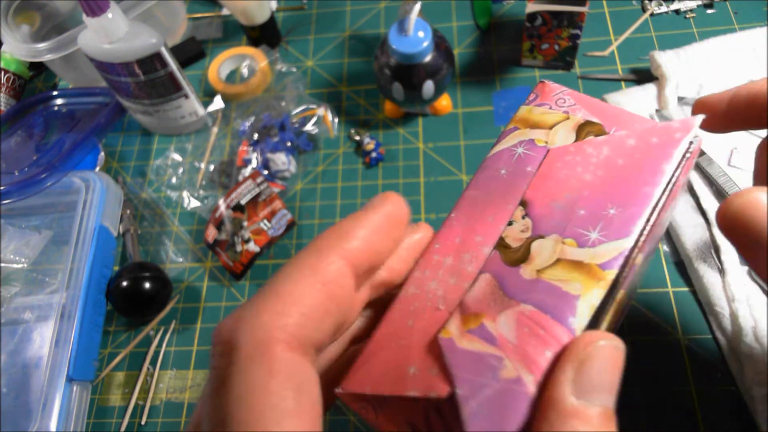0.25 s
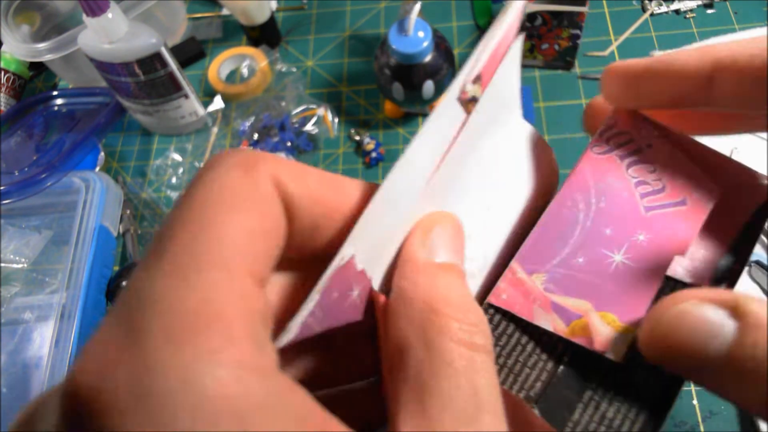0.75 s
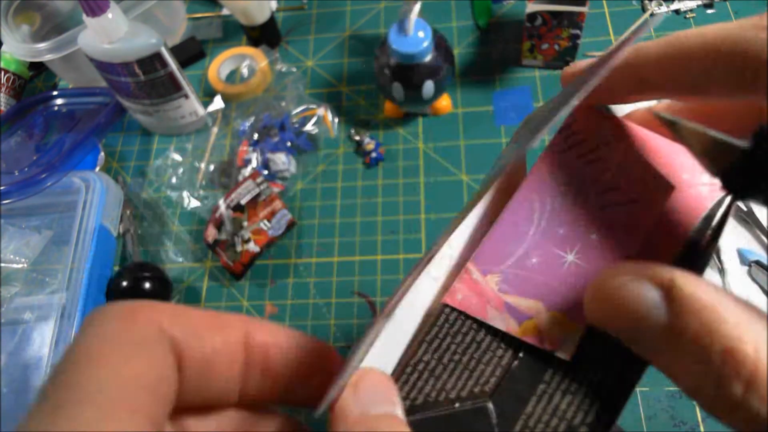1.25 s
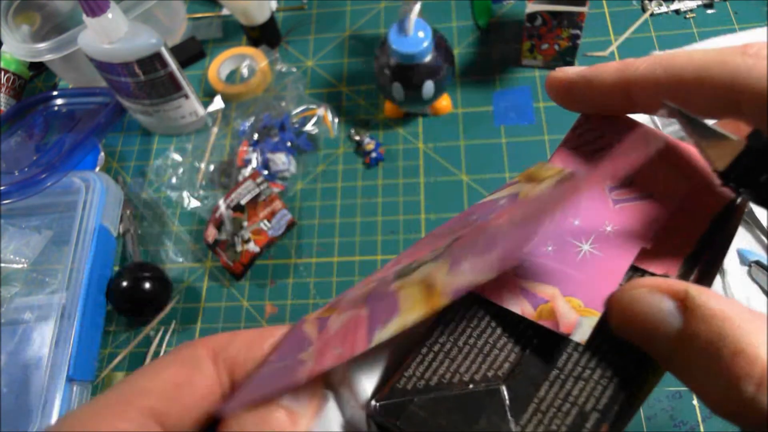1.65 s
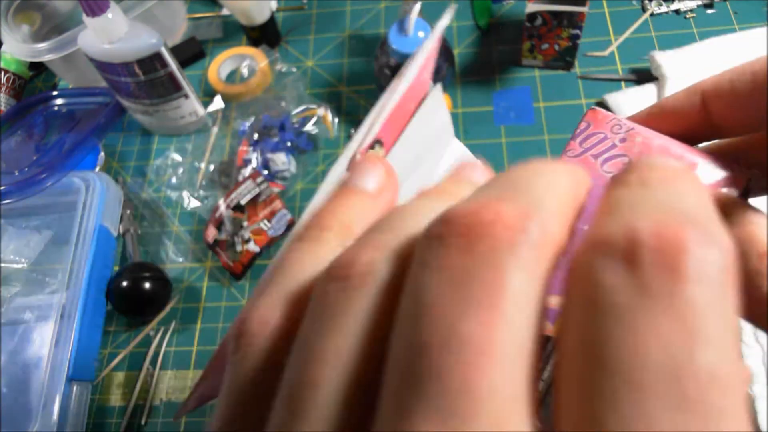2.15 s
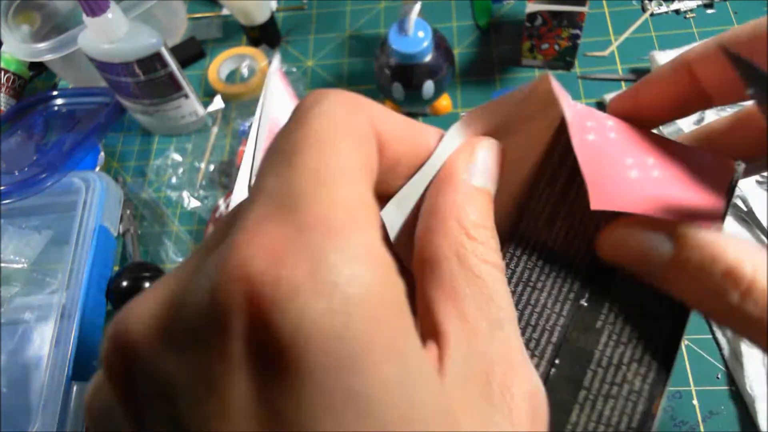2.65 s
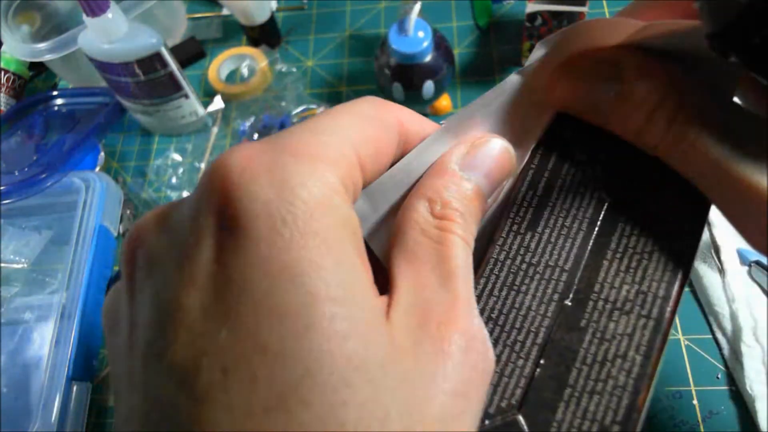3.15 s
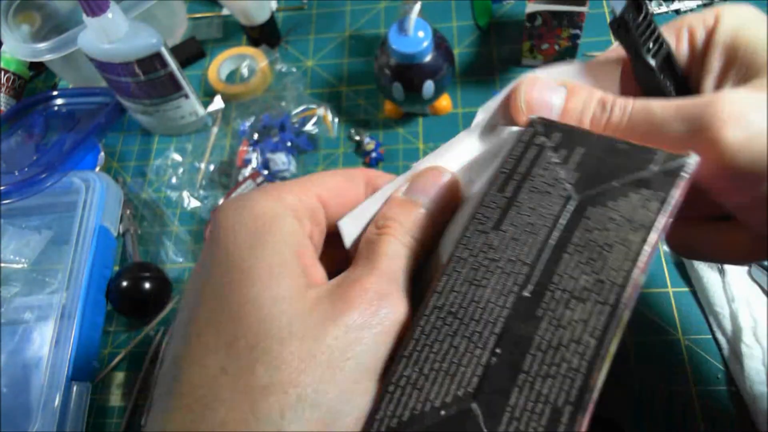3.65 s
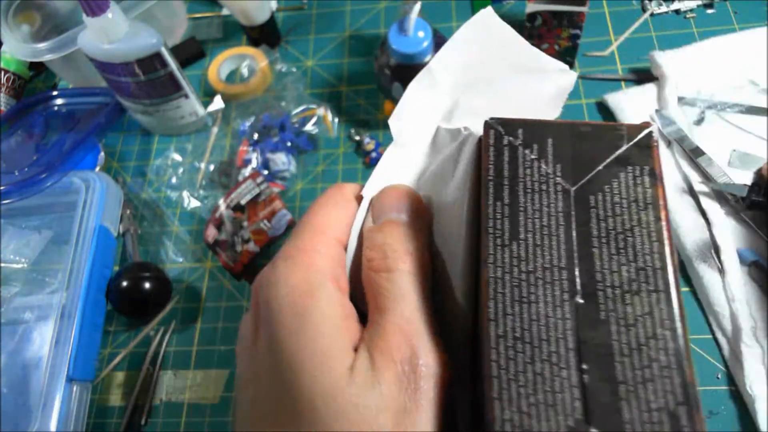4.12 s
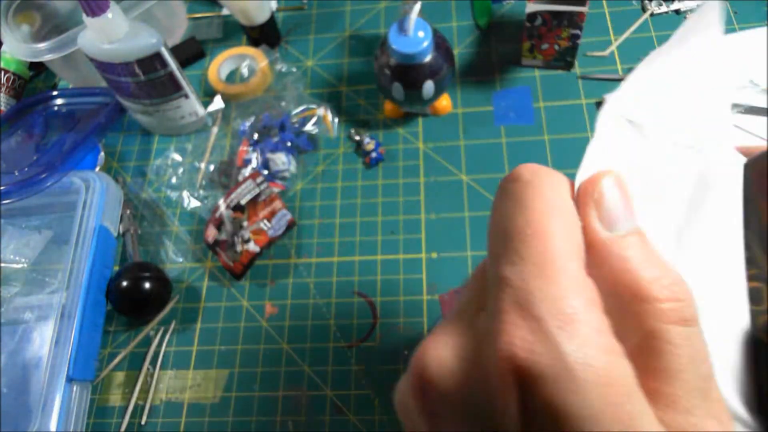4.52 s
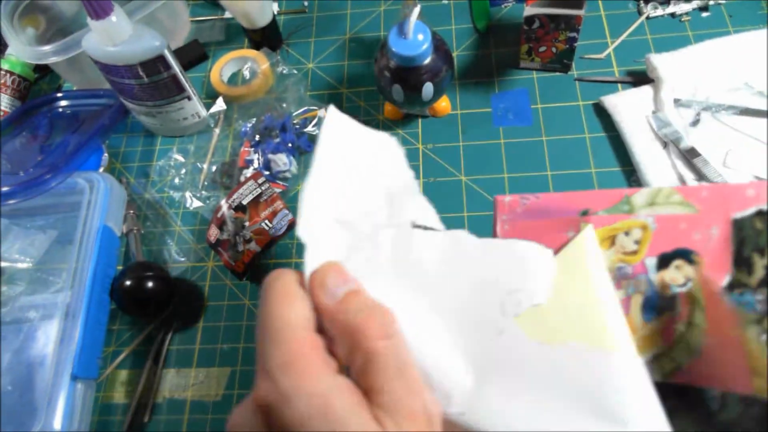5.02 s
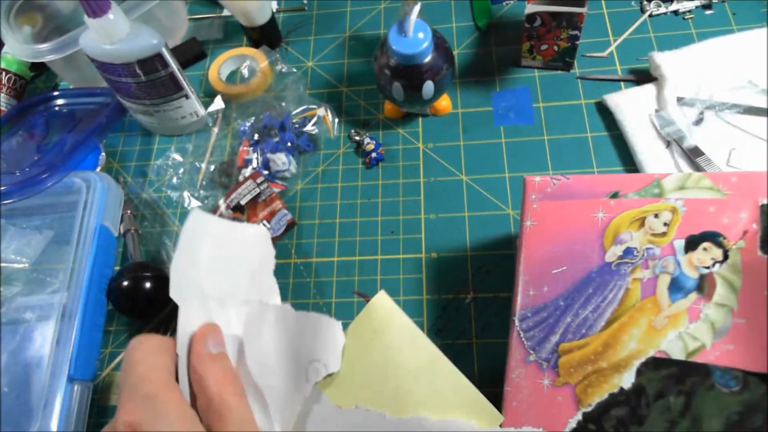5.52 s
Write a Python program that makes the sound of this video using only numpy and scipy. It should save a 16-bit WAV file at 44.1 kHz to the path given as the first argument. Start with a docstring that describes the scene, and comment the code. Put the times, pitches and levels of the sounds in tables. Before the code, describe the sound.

Close-up unwrapping: paper rustles and crinkles, two short rips, a thud on the microphone, then a long ragged tear with floppy paper flaps.

```python
"""Unwrapping a small box

Glossy wrapping paper is picked open, ripped and pulled off a cardboard box, close to a small microphone.
Tears (two short rips, a long one) are dense fibre clicks through moving flap resonances.
Creases are dispersed cracks with a noise flutter; sliding, brushing and flapping are filtered grains or noise.
A bump overloads the microphone, the loudest peaks saturate, and a motor hums faintly over steady hiss."""
import sys
import numpy as np
from scipy import signal
from scipy.fft import rfft, irfft
from scipy.io import wavfile
from scipy.ndimage import uniform_filter1d

SR = 44100
rng = np.random.default_rng(int(sys.argv[2]) if len(sys.argv) > 2 else 0)


def wrap_up_sound(samples):
    """Save the sound to the file named by the first command line argument, as 16-bit audio."""
    columns = np.atleast_2d(samples).T
    # keep every value between -1 and 1, then stretch to whole-number steps
    tamed = np.clip(columns, -1, 1)
    steps = np.round(tamed * 32767).astype(np.int16)
    wavfile.write(sys.argv[1], SR, steps)


N = 254898
TIME = np.arange(N) / SR

# Pulls that tear the sheet. Each row: full level reached at, in s, rise in s, hold in s, fall in s,
# level in dB, treble relative to the level in dB, main resonance of the free flap in Hz.
PULLS = [(1.525, 0.013, 0.0092, 0.055, -19.5, 2, 2050), (1.562, .01, 0.037, 0.063, -22.5, 2.5, 1990),
         (1.631, 0.0082, 0.0084, 0.15, -18, 4, 1940), (1.719, 0.02, 0.0054, 0.071, -15.5, -2.5, 2060),
         (3.345, .014, 0.015, 0.034, -7.5, 7.5, 2340), (3.381, .02, .012, 0.075, -16, 7, 2270),
         (4.559, 0.054, 0.031, 0.065, -8.5, 0.5, 2320), (4.621, 0.035, 0.067, 0.19, -11, 1, 1610),
         (4.814, 0.059, 0.04, .05, -16.5, 4, 1970), (4.851, 0.038, 0.093, 0.022, -12, 3, 1990),
         (4.961, 0.015, 0.11, 0.065, -9.5, 0.5, 2260), (5.098, 0.059, 0.055, 0.25, -16, 0, 2200),
         (5.186, 0.036, 0.042, .11, -17.5, 3.5, 2330), (5.338, .015, 0.043, .06, -25, 6.5, 1780),
         (5.41, 0.079, 0.056, .12, -17.5, 5, 1620), (5.509, 0.028, 0.049, 0.031, -27.5, 3.5, 1760)]
PULL_BASS_DB = -5.5   # relative to the level


def pulling():
    """Strength of the tear in each band: overlapping pulls add in power."""
    return band_gains((swell(*shape), [PULL_BASS_DB, 0, treble_db]) for *shape, treble_db, _ in PULLS)


# Spectrum of breaking fibres. Each row: frequency in Hz, relative level in dB.
RIP_COLOUR = [(60, -7), (150, -5), (300, 0.5), (550, 7.5), (1000, 1.5), (1500, -0.5), (2500, -4.5),
              (4000, -1), (7000, 2), (10000, 2), (14000, 2), (16000, -2)]
JERKY_BELOW_DB = -18.5   # middle-band gain at which jerky and even tearing share the power
FLAP_DB, FLAP_DAMPING = -1, 1   # a taut flap tears brighter, rings less: dB lost per dB of treble


def tearing(gains):
    """A gentle pull tears in jerks; a hard one is an even run of breaking fibres."""
    jerky_clicks = grains(per_s=3000, spread_db=5.0, clump_db=1.0, clumps_per_s=250)
    even_clicks = grains(per_s=5000, spread_db=-0.5, clump_db=4.0, clumps_per_s=320)
    jerky = three_bands(wandering(coloured(jerky_clicks, RIP_COLOUR)))
    even = three_bands(wandering(coloured(even_clicks, RIP_COLOUR)))
    jerky_share = 1 / (1 + (gains[1] / from_db(JERKY_BELOW_DB)) ** 2)
    fibres = np.sqrt(jerky_share) * jerky + np.sqrt(1 - jerky_share) * even
    flap_rows = [(full_s + hold_s / 2, treble_db, hz) for full_s, _, hold_s, _, _, treble_db, hz in PULLS]
    treble_db, flap_hz = in_time(flap_rows)
    return rip(gains, fibres, flap_hz, FLAP_DB - FLAP_DAMPING * treble_db)


# Modes of the free flap. Each row: share of its main resonance, width in Hz,
# ringing gain in dB before the flap's overall level.
FLAP_MODES = [(0.273, 122, -13.5), (.45, 140, -8), (1, 497, 3.5)]


def rip(gains, fibres, flap_hz, flap_db):
    """Breaking fibres shake the free flap, whose modes move together as it is pulled."""
    flap_hz = flap_hz * np.exp(0.07 * drift(22))
    low, middle, high = fibres
    ringing = []
    for drive, (share, width_hz, db) in zip([low, low, middle], FLAP_MODES):
        ringing.append(from_db(db + flap_db) * moving_resonance(drive, share * flap_hz, width_hz))
    low = rms_one(low + ringing[0] + ringing[1])
    middle = rms_one(middle + ringing[2])
    return np.sum(gains * [low, middle, high], axis=0)


# Loudest creases. Each row: time in s, level in dB before the common snap gain, treble relative to
# the level in dB, relative flutter after the crack in dB, pitch of the buckling panel in Hz.
SNAPS = [(0.0278, -43, 4, 0.5, 970), (0.2785, -25.5, -42, -1, 2840), (0.3245, -22, -39, -9, 750),
         (0.4009, -10, -12, -11, 4140), (0.4271, -26, -25, -4, 720), (0.4397, -21, -28, -11, 1400),
         (0.597, -27, -6, -7, 4400), (0.608, -24.5, -11, -20, 3720), (0.651, -29, -13, -5, 2110),
         (0.6673, -15, -4.5, -12, 6000), (1.03, -23.5, -7, -9.5, 5600), (1.073, -18, -6.5, -9, 1770),
         (1.2148, -9.5, -4, -9.5, 8100), (1.3905, -28.5, -4, -10, 1230), (1.5117, -21, -3, -6, 1090),
         (1.5283, -17.5, 1.5, 1, 9300), (1.5582, -13.5, 11, -9, 6100), (1.5728, -11, -1, -9, 6300),
         (1.5969, -16, 10, -9, 1500), (1.6316, -15, 2, -2.5, 2220), (1.6576, -7, -2, -14, 8550),
         (1.6712, -5.5, -7, -9, 6500), (1.6874, -29, -11, 9, 1780), (1.7205, -9.5, -1, -3.5, 9200),
         (1.7274, -10, -3, -5, 8400), (1.7405, -17, -1, -15, 1900), (1.8143, -26, -23, -13, 2080),
         (2.3051, -26.5, 7.5, 2, 4400), (2.5594, -19, -22, -4.5, 2470), (2.6138, -22, -29, -16, 1280),
         (2.6201, -12.5, -8.5, -7.5, 1170), (2.6654, -25, -24, -24, 1500), (2.678, -29.5, -22, 7.5, 1500),
         (2.6855, -17, 2, 0.5, 3340), (2.7109, -13.5, -14, -5.5, 4400), (2.7653, -13, -26, -14, 915),
         (2.8251, -19, -30, -9, 554), (2.9485, -32, -29, 2, 1300), (3.0522, -17, -13, -28, 3300),
         (3.071, -26, -4, -19, 6470), (3.1147, -24, -13, -10, 3370), (3.172, -24.5, -23, -7.5, 2000),
         (3.3052, -28, -24, -10, 970), (3.3295, -14.5, -19, -4.5, 1820), (3.3334, -13.5, -3, -1.5, 7500),
         (3.4028, -13, 4, -14, 7160), (3.4086, -7, -20, -29, 2580), (3.4136, -28, 6, -20, 8500),
         (3.4205, -19, -2, -6, 1700), (3.491, -22, -12, -19, 2920), (3.5035, -14, -36, -34, 1390),
         (3.6097, -8, -25, -14, 850), (3.6226, -18, -9, -12, 750), (3.6358, -24, -11, -6, 1400),
         (3.6511, -14, -2, -8.5, 635), (3.7277, -20.5, -1, -2.5, 2520), (3.8846, -27, -35, -8, 830),
         (3.9692, -32.5, -9, 3.5, 1080), (4.0304, -25, -30, -2, 1100), (4.0452, -24.5, -3, 0, 1540),
         (4.078, -18, 8, -4, 1050), (4.1065, -36, 14, 3, 5800), (4.153, -25, -3, -7, 3650),
         (4.163, -15, -2.5, -2.5, 1460), (4.1791, -16, -5, -7, 5040), (4.1897, -19, -9, 0.5, 5400),
         (4.2403, -25, -14, -5, 1180), (4.2674, -14, -0.5, -7, 2340), (4.3018, -24, -14, -10, 900),
         (4.3379, -18, -17, -15, 500), (4.483, -15, -41, -1, 1600), (4.519, -13, -14, -11, 3280),
         (4.7837, -17, 3, -10, 4100), (5.3126, -8, 7.5, -21, 5100), (5.339, -17, -6, 1, 5960),
         (5.559, -28, -14, 2, 2680), (5.6345, -27, -7, -2, 1780), (5.6937, -42, 7, 6, 9600)]


def snapping(creases, gain_db=24.0, size=4096, count=700):
    """Every crease at its moment, coloured by its panel."""
    out = np.zeros(N + size)
    flutters = rng.standard_normal((count, size))
    for (s, db, treble_db, flutter_db, pitch_hz), flutter in zip(creases, flutters):
        start = round(s * SR)
        crease = snap(panel_bands(db, treble_db, pitch_hz), flutter_db, pitch_hz, flutter)
        out[start:start + size] += from_db(gain_db) * crease
    return out[:N]


# Spectrum of a snap. Each row: frequency in Hz, relative level in dB.
SNAP_COLOUR = [(60, -10.5), (200, -4), (400, 3), (750, 7), (1200, 4), (2500, 1), (4500, -1), (8000, -1.5),
               (12000, -6.5), (16000, -9.5)]
# Where the low, middle and high levels of a snap apply: one centre in Hz per entry.
BAND_CENTRES_HZ = [650, 3300, 12000]


def snap(band_db, flutter_db, pitch_hz, flutter, ring_db=8, ring_octaves=0.29, bend_s=0.00131,
         flutter_s=0.0054, settle_db=-7, settle_s=0.0039):
    """A crease buckles: one sharp bending wave rings its panel, then the sheet flutters and settles."""
    t, hz = TIME[:len(flutter)], np.fft.rfftfreq(len(flutter), 1 / SR)
    # bending waves carry the treble faster than the bass; bend_s is the delay at 1 kHz
    crack = np.exp(-4j * np.pi * bend_s * np.sqrt(1000 * hz))
    fluttering = np.exp(-t / flutter_s) / np.sqrt(flutter_s)
    settling = from_db(settle_db) * np.exp(-t / settle_s) / np.sqrt(settle_s)
    tail = from_db(flutter_db + 2.5) * flutter * (fluttering + settling) * np.sqrt(2 / SR)
    bands = list(zip(BAND_CENTRES_HZ, band_db))

    def panel_db(f):
        """Snap colour, band levels and the panel's resonance."""
        ring = ring_db / (1 + (np.log2((f + 1) / pitch_hz) / ring_octaves) ** 2)
        return at_hz(SNAP_COLOUR, f) + at_hz(bands, f) + ring

    return irfft((crack + rfft(tail)) * causal(panel_db))


EVEN_PANEL_HZ, BASS_LOSS_DB_PER_OCTAVE, MOST_BASS_LOSS_DB, MIDDLE_LOSS_DB_PER_OCTAVE = 1200, 7, 12, 10


def panel_bands(db, treble_db, pitch_hz):
    """A panel smaller than the even one radiates less bass, a larger one less of the middle."""
    octaves = np.log2(pitch_hz / EVEN_PANEL_HZ)
    bass_loss_db = np.clip(BASS_LOSS_DB_PER_OCTAVE * octaves, 0, MOST_BASS_LOSS_DB)
    middle_loss_db = max(-MIDDLE_LOSS_DB_PER_OCTAVE * octaves, 0)
    return [db - bass_loss_db, db - middle_loss_db, db + treble_db]


# Faint creases while handling; fibre bundles while tearing. Levels: dB relative to the middle-band
# gain of the movement, before the common snap gain. Pitches are medians.
CRINKLES_PER_S, CRINKLE_DB, CRINKLE_TREBLE_DB, CRINKLE_PITCH_HZ = 9, 0.5, -30, 1900
BUNDLES_PER_S, BUNDLE_DB, BUNDLE_TREBLE_DB, BUNDLE_PITCH_HZ = 45, -4.5, 5, 4860
CHANCE_FLUTTER_DB, CHANCE_SPREAD_DB, CHANCE_SPREAD_OCTAVES = -4, 2.5, 0.68


def chance_snaps(gain, per_s, db, treble_db, pitch_hz, count=600):
    """Small snaps at random moments that follow the movement's level; rows like those of SNAPS."""
    moments = np.cumsum(rng.exponential(1, count)) / per_s
    rows = []
    for s, (strength, panel) in zip(moments, rng.standard_normal((count, 2))):
        if s < TIME[-1]:
            level_db = db + 20 * np.log10(gain[int(s * SR)]) + CHANCE_SPREAD_DB * strength
            panel_hz = pitch_hz * 2 ** (CHANCE_SPREAD_OCTAVES * panel)
            rows.append((s, level_db, treble_db, CHANCE_FLUTTER_DB, panel_hz))
    return rows


# Paper dragged over the box. Each row: full level reached at, in s, rise in s, hold in s, fall in s,
# level in dB.
DRAGS = [(0.279, 0.08, 0.02, .03, -26.5), (0.317, 0.026, 0.04, 0.052, -20.5),
         (0.392, .02, 0.043, 0.081, -27), (1.41, 0.3, .02, 0.047, -38), (1.457, 0.024, 0.039, 0.11, -35.5),
         (1.767, .03, 0.14, 0.14, -40), (2.103, 0.038, .01, 0.047, -38.5),
         (2.306, 0.026, 0.034, 0.051, -39.5), (3.493, 0.067, 0.026, 0.12, -33),
         (3.625, 0.079, .04, 0.87, -33.5), (4.423, .04, 0.18, 0.1, -24.5)]
DRAG_MIDDLE_DB, DRAG_TREBLE_DB = -8, -18   # relative to the level
# Glossy face sliding freely. Each row: full level reached at, in s, rise in s, hold in s, fall in s,
# level in dB, treble relative to the level in dB.
SWISHES = [(0.191, 0.014, 0.011, 0.091, -40.5, -5), (0.345, 0.03, .01, 0.045, -36.5, 6),
           (0.387, 0.026, 0.0085, 0.073, -31.5, -1), (0.496, 0.072, .02, 0.14, -42.5, -3.5),
           (0.591, 0.011, 0.015, .05, -39, -5), (0.632, 0.031, 0.036, 0.071, -36, 5),
           (0.873, 0.13, 0.0045, 0.013, -39, 4), (0.953, .16, 0.062, 0.22, -38.5, 1),
           (1.209, 0.029, 0.14, 0.43, -46.5, 3), (1.458, 0.015, 0.032, .1, -36, 2.5),
           (1.78, .03, .11, 0.25, -38.5, -1), (2.032, 0.017, 0.0043, 0.038, -33.5, 6),
           (2.057, .04, 0.05, 0.081, -44.5, 0.5), (2.251, .08, .01, .05, -44.5, 2),
           (2.305, 0.0069, 0.0075, 0.13, -39, 6), (2.473, 0.11, 0.021, 0.15, -44, 3.5),
           (2.621, 0.051, .01, 0.11, -39, 1), (2.692, .03, .02, .08, -33, 4),
           (2.777, .05, 0.36, .15, -46, 3), (2.954, 0.079, 0.033, 0.041, -37.5, 1),
           (3.242, 0.04, 0.017, 0.081, -40, 4.5), (3.457, .02, 0.14, .1, -40, 0.5),
           (3.577, 0.017, 0.0046, 0.035, -30, 8), (3.624, 0.052, 0.13, 0.18, -37, 5.5),
           (3.973, 0.065, .005, 0.047, -39.5, 2.5), (4.05, 0.074, .01, 0.31, -31.5, 1),
           (4.153, .03, 0.035, 0.27, -36, 0), (4.315, .05, 0.036, .1, -42, -0.5),
           (4.514, .008, .02, 0.054, -33, 13), (5.547, 0.061, 0.1, 0.11, -40, 3.5),
           (5.696, .01, 0.012, 0.092, -40.5, 1)]
SWISH_BASS_DB = -4   # relative to the level
HOLDING_DB = -54.5   # steady floor in each band: the paper stirs in the hands


def handling():
    """Strength of the sliding paper in each band: dull drags, bright swishes and the resting hands."""
    drags = [(swell(*shape), [0, DRAG_MIDDLE_DB, DRAG_TREBLE_DB]) for shape in DRAGS]
    swishes = [(swell(*shape), [SWISH_BASS_DB, 0, treble_db]) for *shape, treble_db in SWISHES]
    return np.hypot(band_gains(drags + swishes), from_db(HOLDING_DB))


# Spectrum of coarse slips. Each row: frequency in Hz, relative level in dB.
RUSTLE_COLOUR = [(80, -19), (190, -10.5), (310, -7.5), (550, 2), (900, -0.5), (1400, -15), (2200, -19.5),
                 (4200, -25.5), (7000, -44), (11000, -24), (16000, -22)]
# Spectrum of the glossy face. Each row: frequency in Hz, relative level in dB.
SWISH_COLOUR = [(300, 2), (1500, 1), (2600, -6), (3600, -2.5), (4700, 0.5), (6000, 0.5), (8000, 1),
                (12000, -0.5), (16000, -3)]


def rustling(gains):
    """Sliding paper: coarse slips drum on the box, fine ones swish on the glossy face."""
    slips = grains(per_s=2200, spread_db=2.5, clump_db=8, clumps_per_s=86)
    friction = grains(per_s=14000, spread_db=3.0, clump_db=3.0, clumps_per_s=160)
    low, coarse, _ = three_bands(wandering(coloured(slips + .5 * friction, RUSTLE_COLOUR)))
    _, fine, high = three_bands(wandering(coloured(0.43 * slips + friction, SWISH_COLOUR)))
    coarse_share = 1 / (1 + (gains[1] / gains[0]) ** 2)
    middle = rms_one(np.sqrt(coarse_share) * coarse + np.sqrt(1 - coarse_share) * fine)
    return np.sum(gains * [low, middle, high], axis=0)


# Fingertips on the paper. Each row: full level reached at, in s, rise in s, hold in s, fall in s,
# level in dB, pitch in Hz.
BRUSHES = [(0.275, 0.045, 0.032, 0.032, -42, 2900), (0.628, .03, 0.015, 0.035, -28.5, 5400),
           (0.943, 0.1, 0.048, 0.15, -34.5, 4200), (1.275, .06, .03, .05, -40.5, 10400),
           (1.815, .03, 0.11, .12, -47, 4770), (2.903, .15, 0.089, .06, -48, 6900),
           (4.437, .05, 0.057, .03, -34, 1960)]
BRUSH_WIDTH_HZ = 1500


def brushing():
    """Fingertips slide evenly: smooth hiss around one pitch, coloured by the paper under them."""
    pitch_rows = [(full_s + offset_s, hz) for full_s, _, hold_s, _, _, hz in BRUSHES
                  for offset_s in (0, hold_s)]
    pitch_hz, = in_time(pitch_rows)
    hiss = moving_resonance(rng.standard_normal(N), pitch_hz, BRUSH_WIDTH_HZ)
    hiss = rms_one(moving_resonance(hiss, pitch_hz, 2 * BRUSH_WIDTH_HZ))
    return hiss * sum(swell(*shape) for *shape, _ in BRUSHES)


# Flaps of the freed sheet, lower as more of it hangs loose. Each row: full level reached at, in s,
# rise in s, hold in s, fall in s, level in dB, pitch until full level in Hz, sag after it in octaves per s.
BILLOWS = [(1.732, .035, .01, .17, -23, 290, 0.2), (4.586, 0.18, 0.032, 0.12, -16.5, 416, 7.3),
           (4.854, 0.1, 0.28, 0.28, -22.5, 245, 7.9)]
LOWEST_FLAP_HZ = 79


def billow(row, width_share=0.51):
    """The freed sheet pushes air in soft, uneven flaps around its lowest mode."""
    *shape, first_hz, sag = row
    since_full_s = np.maximum(TIME - shape[0], 0)
    pitch_hz = np.maximum(first_hz * 2 ** (-sag * since_full_s), LOWEST_FLAP_HZ)
    width_hz = width_share * first_hz
    flaps = grains(per_s=650, spread_db=6.5, clump_db=6, clumps_per_s=40)
    flaps = moving_resonance(flaps, pitch_hz, width_hz)
    flaps = rms_one(moving_resonance(flaps, pitch_hz, 2 * width_hz))
    return swell(*shape) * flaps


def bump(at_s=3.424):
    """A knock pins the microphone for a moment; its coupling swings back and settles."""
    pinned = np.interp(TIME - at_s, [0, .0004, .0098, .0118], [0, -4.2, -4.2, 0])
    coupling = signal.butter(1, 9.4, "high", fs=SR)
    return signal.lfilter(*coupling, signal.lfilter(*coupling, pinned))


def workshop(x, tail_db=-14, t60=0.12, size=16384):
    """The direct sound and the short, dense tail of a cluttered room."""
    t = TIME[:size]
    tail = rng.standard_normal(size) * from_db(-60 * t / t60) * (1 - np.exp(-t / 0.0024))
    tail = signal.lfilter(*signal.butter(1, 9000, fs=SR), tail)
    response = from_db(tail_db) * tail / np.linalg.norm(tail)
    response[0] += 1
    return signal.fftconvolve(x, response / np.linalg.norm(response))[:N]


# Motor hum. Each row: frequency in Hz, rms level in dB.
HUM = [(59.5, -40), (118.8, -47), (178.2, -70), (231.5, -61.5)]
# Spectrum of the steady hiss. Each row: frequency in Hz, relative level in dB.
AIR_COLOUR = [(25, -2), (45, -1), (90, 0), (170, -7.5), (380, -10), (640, -10), (1500, -13.5), (2750, -21),
              (6000, -38), (13500, -36.5), (16000, -46)]
AIR_RMS_DB = -44


def background():
    """A motor's hum, as steady sines, over soft filtered noise."""
    hum = np.zeros(N)
    for hz, rms_db in HUM:
        hum += np.sqrt(2) * from_db(rms_db) * np.sin(2 * np.pi * (hz * TIME + rng.random()))
    return hum + from_db(AIR_RMS_DB) * coloured(rng.standard_normal(N), AIR_COLOUR)


SWELL_DB = 27.5   # drop one rise before the hold, or one fall after it


def swell(full_s, rise_s, hold_s, fall_s, level_db):
    """Gain of one hand movement: rise to full level at full_s, hold and fall, straight in dB."""
    away = np.maximum((full_s - TIME) / max(rise_s, .002), (TIME - full_s - hold_s) / max(fall_s, .002))
    return from_db(level_db - SWELL_DB * np.clip(away, 0, 6))


def band_gains(movements):
    """Low, middle and high gain of overlapping movements, each (gain in time, dB in the three bands)."""
    power = np.zeros((3, N))
    for gain, band_db in movements:
        power += np.outer(from_db(band_db) ** 2, gain ** 2)
    return np.sqrt(power)


def grains(per_s, spread_db, clump_db, clumps_per_s):
    """Tiny clicks of uneven size, bunched by stick and slip; the slow level is even."""
    sizes = from_db(spread_db * np.minimum(rng.exponential(1, N), 4)) * rng.choice([-1, 1], N)
    happens = rng.random(N) < per_s / SR
    clicks = sizes * happens * from_db(clump_db * drift(clumps_per_s))
    return clicks / np.sqrt(uniform_filter1d(clicks ** 2, size=1300).clip(0) + 1e-6)


def wandering(x, echo_db=-8, delay_s=0.000607, swing=0.443):
    """The sheet gives back a dull reflection; as it curls the path changes and the colour shifts."""
    path_s = delay_s * np.exp(swing * drift(12))
    dull = signal.sosfilt(signal.butter(2, 2200, fs=SR, output="sos"), x)
    return rms_one(x + from_db(echo_db) * np.interp(TIME - path_s, TIME, dull))


def moving_resonance(x, centre_hz, width_hz, size=256):
    """A two-pole band-pass whose centre moves, updated once per block."""
    r = np.exp(-np.pi * width_hz / SR)
    zeros = np.array([1, 0, -1]) * (1 - r * r) / 2
    out, state = np.zeros(N), np.zeros(2)
    for i in range(0, N, size):
        poles = [1, -2 * r * np.cos(2 * np.pi * centre_hz[i] / SR), r * r]
        out[i:i + size], state = signal.lfilter(zeros, poles, x[i:i + size], zi=state)
    return out


# Edges between low, middle and high: one frequency in Hz per entry.
CROSSOVERS_HZ = [1400, 5000]


def three_bands(x):
    """Low, middle and high parts of a sound, each of unit power."""
    hz, spectrum = np.fft.rfftfreq(2 ** 18, 1 / SR), rfft(x, 2 ** 18)
    low, upto_middle = [1 / (1 + (hz / edge) ** 6) for edge in CROSSOVERS_HZ]
    parts = (low, upto_middle - low, 1 - upto_middle)
    return [rms_one(irfft(spectrum * part)[:N]) for part in parts]


def coloured(x, colour):
    """Filter a signal by a spectrum; unit power."""
    response = irfft(causal(lambda hz: at_hz(colour, hz)))
    return rms_one(signal.fftconvolve(x, response)[:N])


def causal(gain_at, size=4096):
    """Minimum-phase frequency response for a dB curve, so that nothing sounds early."""
    cepstrum = irfft(np.log(from_db(gain_at(np.fft.rfftfreq(size, 1 / SR)))))
    cepstrum[1:size // 2] *= 2
    cepstrum[size // 2 + 1:] = 0
    return np.exp(rfft(cepstrum))


def at_hz(points, hz):
    """Read a spectrum on a log-frequency axis."""
    where_hz, db = np.transpose(points)
    return np.interp(np.log(hz + 1), np.log(where_hz), db)


def in_time(rows):
    """Each column of a curve at every sample."""
    s, *columns = np.transpose(rows)
    return [np.interp(TIME, s, column) for column in columns]


def drift(per_s):
    """Random values joined by straight lines, of unit power."""
    knots = rng.standard_normal(N // 20)
    return rms_one(np.interp(TIME * per_s, np.arange(len(knots)), knots))


def rms_one(x):
    """Scale to unit power."""
    return x / np.sqrt(np.mean(x ** 2) + 1e-20)


def from_db(db):
    """Decibels to gain."""
    return 10 ** (np.asarray(db) / 20)


def scene():
    """Paper in the room, the bump and the background, in mono."""
    room_tone, sliding, pull = background(), handling(), pulling()
    paper = tearing(pull) + rustling(sliding) + brushing() + sum(billow(row) for row in BILLOWS)
    crinkles = chance_snaps(sliding[1], CRINKLES_PER_S, CRINKLE_DB, CRINKLE_TREBLE_DB, CRINKLE_PITCH_HZ)
    bundles = chance_snaps(pull[1], BUNDLES_PER_S, BUNDLE_DB, BUNDLE_TREBLE_DB, BUNDLE_PITCH_HZ)
    snaps = snapping(SNAPS + crinkles + bundles)
    return (workshop(paper + snaps) + bump() + room_tone)[None]


CUTOFF_HZ = 16000


def record(dry):
    """The input saturates at full scale and the top is cut."""
    saturated = dry / (1 + np.abs(dry) ** 8) ** (1 / 8)
    return signal.sosfilt(signal.ellip(12, .1, 80, CUTOFF_HZ, fs=SR, output="sos"), saturated)


dry = scene()
out = record(dry)
wrap_up_sound(out)
```